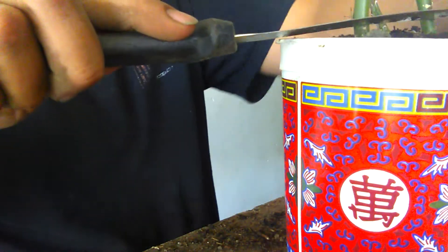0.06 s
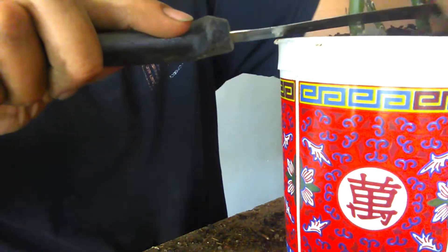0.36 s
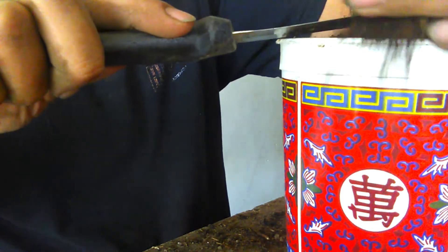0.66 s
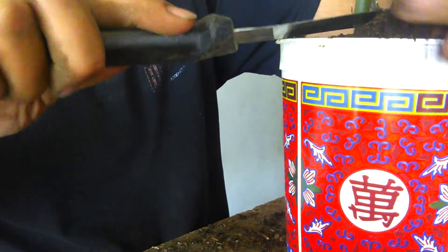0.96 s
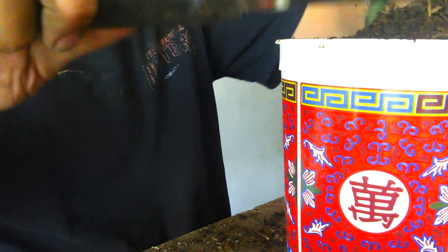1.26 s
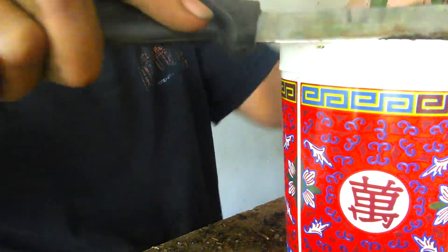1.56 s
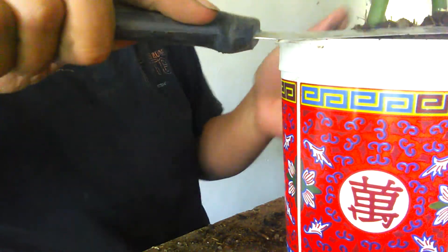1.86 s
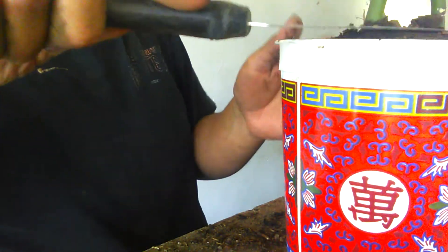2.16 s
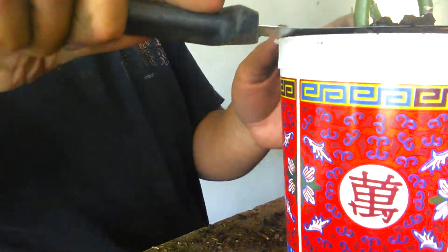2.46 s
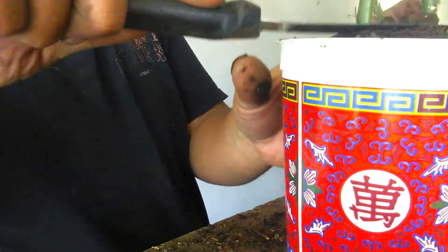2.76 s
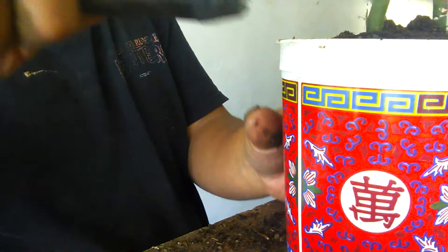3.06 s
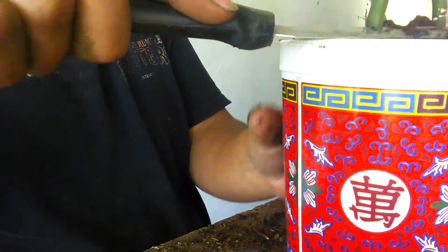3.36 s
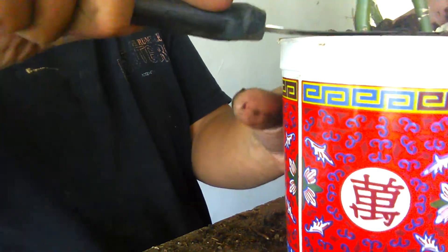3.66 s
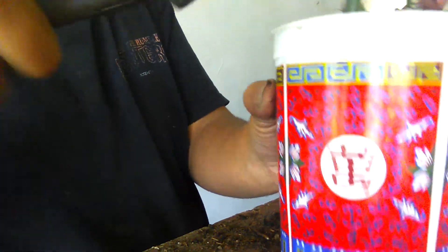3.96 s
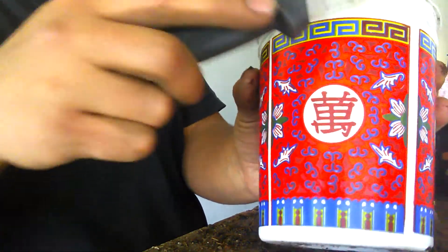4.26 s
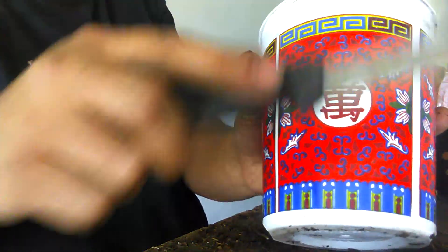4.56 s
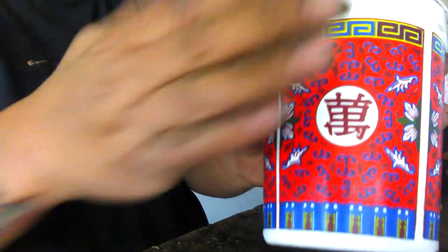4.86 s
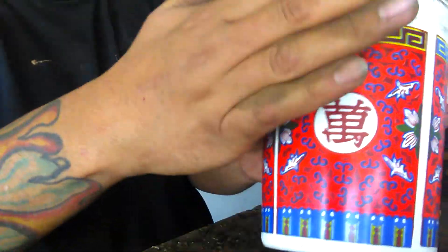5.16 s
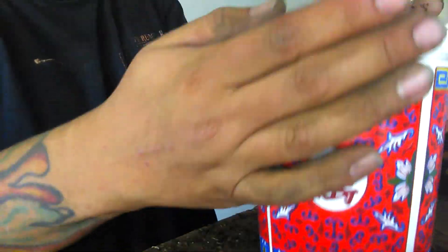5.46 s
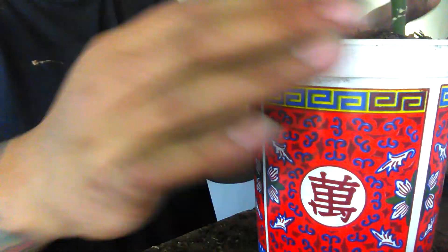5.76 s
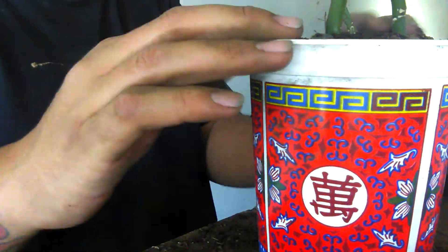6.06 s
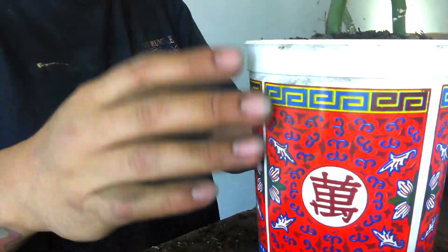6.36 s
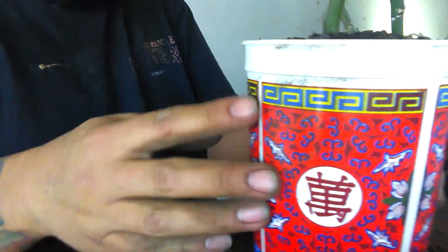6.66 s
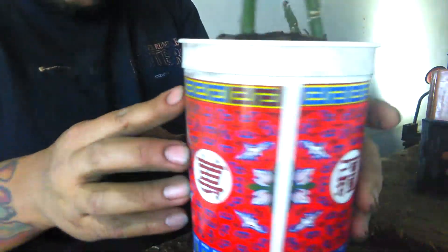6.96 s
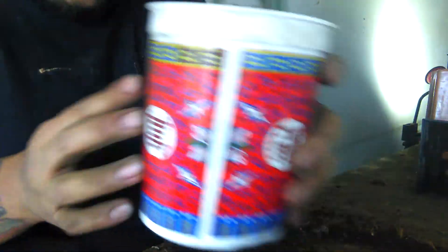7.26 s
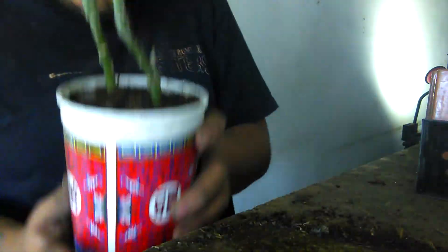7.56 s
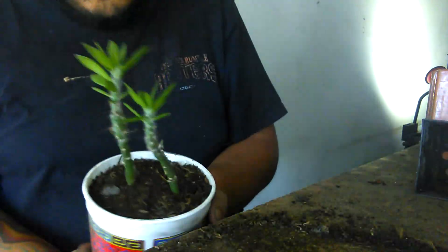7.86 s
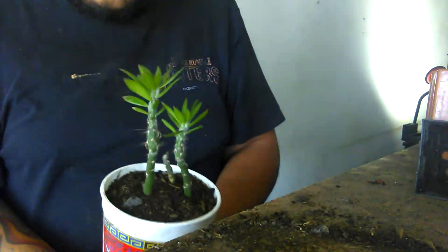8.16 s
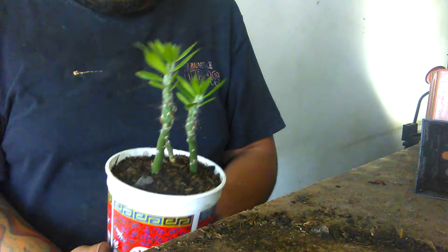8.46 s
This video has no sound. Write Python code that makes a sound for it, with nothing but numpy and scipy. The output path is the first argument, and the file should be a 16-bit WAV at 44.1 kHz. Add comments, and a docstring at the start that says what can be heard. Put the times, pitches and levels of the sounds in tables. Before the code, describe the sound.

A blunt knife faintly scrapes soil from a small plastic plant pot, with crumbling clods, short rasps along the rim and light ticks. Midway the knife drops on the wooden workbench, clacking and ringing briefly as it rocks to rest. Hands bump the pot, drag it juddering over grit and knock it once against the bench edge. Microphones stand on the bench in a small hard-walled room, with thuds heavier on the left.

```python
"""A wooden workbench in a small hard-walled room. A blunt knife scrapes soil off a small plastic plant
pot, rasps along its rim, taps its wall and is dropped on the bench, where it clacks and rings.
Hands shift the pot, drag it stick-slip over grit and bump it against the edge.
The microphones stand on the bench, so its thuds reach the left one through the wood."""
import sys
import numpy as np
from scipy import signal
from scipy.fft import rfft, irfft
from scipy.io import wavfile
from scipy.ndimage import uniform_filter1d

SR = 44100
rng = np.random.default_rng(int(sys.argv[2]) if len(sys.argv) > 2 else 0)


def inscribe(sig):
    """Save sig as 16-bit PCM at rate SR to the path in sys.argv[1].

    A 1-D sig is mono; a 2-D sig holds one channel per row.
    Samples are clipped to [-1, 1] before scaling.
    """
    pcm = np.round(np.clip(np.atleast_2d(sig).T, -1, 1) * 32767)
    wavfile.write(sys.argv[1], SR, pcm.astype(np.int16))


N = 383229
TIME_S = np.arange(N) / SR
FREQ_HZ = np.fft.rfftfreq(N, 1 / SR)
BLOW_SAMPLES = .02 * SR  # rms window of a blow's level
LN_1000 = np.log(1000)  # 60 dB of decay

# pot wall modes: (frequency [Hz], level [dB], t60 [s], right gain [signed ratio])
POT_MODES = [(277.4, -1, 0.049, -0.47), (503, -19, 0.0058, -0.018), (648.5, 1, 0.034, -0.17),
             (748, -1, 0.037, 0.14), (899, 5, 0.033, -0.11), (928.7, 3, 0.035, -0.069),
             (1154, -19.5, 0.02, -0.84)]
# spectra of grit, pot rim, ticks on plastic, crushed soil: (frequency [Hz], level [dB])
GRIT_SPECTRUM = [(200, -13), (900, 2), (2000, 5.5), (3700, 3), (5200, -4), (7600, -3), (9500, -11),
                 (15000, -17)]
RIM_SPECTRUM = [(300, -15), (1200, -4.5), (1600, -7.5), (1950, -3), (2300, -4.5), (2800, -7), (3450, -3),
                (3800, -4), (4150, -3.5), (4600, -9.5), (5100, -13), (5800, -21), (7500, -18.5),
                (15000, -28.5)]
TICK_SPECTRUM = [(500, -11), (2000, -15), (5000, -0.5), (7500, 0), (10000, -5), (15000, -18)]
SOIL_SPECTRUM = [(200, -1), (600, 9), (1200, 3), (2100, -8), (3000, -24), (8000, -13), (15000, -26.5)]


def knife_fall():
    """Knife lands tip first, then on its handle, and rocks to rest. Returns bench force, sound."""
    # contacts: (time [s], thud [dB], handle clack [dB], blade clink [dB], pot wall [dB])
    contacts = [(4.809, -44.5, -44, -28, -47), (4.8208, -33, -47, -29, -34.5),
                (4.828, -41.5, -37.5, -43, -46.5), (4.8598, -31.5, -17.5, -36.5, -16),
                (4.8645, -21, -26.5, -55, -32), (4.873, -26, -33, -37.5, -34.5),
                (4.894, -30, -45, -44, -53), (4.9015, -48, -27, -38, -44.5), (4.9104, -29, -32, -39, -22),
                (4.939, -36.5, -46.5, -46, -35), (4.969, -31, -40, -54, -41),
                (4.9906, -27, -53, -51, -30.5), (5.011, -38.5, -49, -45, -46), (5.016, -36, -40, -39, -51),
                (5.029, -38.5, -53, -40.5, -48), (5.0433, -31.5, -46.5, -40.5, -46)]
    # free knife: (frequency [Hz], level [dB], t60 [s])
    knife_modes = [(318.4, 0.5, 0.58), (458, 3.5, 0.29), (619, 5, 0.38), (674, 1.5, 0.19),
                   (755, -0.5, 0.34), (970, 4.5, 0.23), (1180, 8.5, 0.24), (1285, 0, 0.64),
                   (1322, 0.5, 0.51), (1450, 1, 0.2), (1480, -17.5, .6), (1814, 11.5, 0.14),
                   (1910, 2.5, 0.17), (2360, 0, .2), (2433, -1.5, .33), (3000, -3, .3), (2961, -3.5, 0.291)]
    # handle and blade impacts: (frequency [Hz], level [dB])
    clack_spectrum = [(80, -28.5), (200, 12.5), (290, 5), (410, 4.5), (520, -1), (720, 10.5), (1000, -1),
                      (1400, -2.5), (1900, 1.5), (2900, -7), (3700, -17), (8000, -32.5), (16000, -52)]
    clink_spectrum = [(200, -58), (800, 11), (1400, 4.5), (2100, 9), (3300, 4), (4300, -4.5), (7600, -3.5),
                      (9500, -14), (15000, -26)]
    # clack lows travel through the board, so the right gets less: (frequency [Hz], gain [dB])
    clack_right_eq = [(100, -13), (230, -8), (350, -2.5), (520, 4), (720, -11), (1000, 3), (2000, -2.5),
                      (8000, -2)]
    times_s, thud_db, clack_db, clink_db, wall_db = np.transpose(contacts)
    left, right = cracks(times_s, clack_db, clack_spectrum, decay_s=.0024, spike=.3,
                         chatter_db=-18, chatter_s=.012, rise_s=.0003)
    clack = np.array([amp(1) * left, equalise(right, clack_right_eq)])
    clink = cracks(times_s, clink_db, clink_spectrum, decay_s=.0046, spike=.061,
                   chatter_db=-23, chatter_s=.01, rise_s=.00047)
    ringing = convolve(impulses(times_s, clack_db), ring(knife_modes, spread_db=4.5))
    wall = resonate(impulses(times_s, wall_db), body(POT_MODES, contact_hz=1440))  # via the board
    grit = grit_scatter(impulses(times_s, clink_db))
    return impulses(times_s, thud_db), clack + stereo(2, 0) * clink + amp(-8.5) * ringing + wall + grit


def soil_scraping():
    """Soil hisses under blade and fingers; grains snap and clods crumble."""
    # hand strokes: (time [s], length [s], level [dB])
    strokes = [(0.517, 0.078, -58.5), (0.66, 0.74, -61), (1.197, 0.39, -60.5), (3.222, 0.19, -54),
               (3.432, 0.12, -53.5), (3.54, 0.12, -58.5), (4.256, 0.11, -48.5), (4.574, 0.35, -65.5),
               (5.92, 0.12, -62), (6.2, 0.058, -65), (6.362, 0.033, -62), (6.456, 0.17, -61.5)]
    # crumbling clods: (time [s], length [s], level [dB], pitch [Hz])
    crumbs = [(.257, 0.011, -58, 1900), (.345, 0.04, -59.5, 890), (.383, 0.018, -58.5, 980),
              (.53, 0.021, -57.5, 1690), (.556, 0.016, -63, 1290), (.79, .018, -56, 895),
              (.812, 0.023, -52.5, 840), (.932, 0.024, -66, 750), (.958, 0.013, -54, 1440),
              (.98, 0.021, -58, 1020), (1.09, .025, -58, 900), (1.199, 0.0062, -56, 1820),
              (1.264, 0.011, -68, 1350), (1.279, 0.0079, -55, 1250), (1.296, 0.011, -54, 940),
              (1.318, 0.016, -56, 980)]
    stroke = swells(strokes, rise_share=.077, fall_share=.48)
    clumping = unit_rms(amp(2.5 * wander(rate_hz=30)))
    slips = stereo_grains(per_s=1300, spread_db=2) * stroke * clumping
    hiss = amp(-6) * tint(slips, GRIT_SPECTRUM)
    snaps = amp(-11) * tint(stereo_grains(per_s=420, spread_db=1) * stroke, TICK_SPECTRUM)
    hollow = amp(-5.5) * resonate(slips[0], body(POT_MODES, contact_hz=1498))
    return hiss + snaps + scuffs(crumbs, per_s=2600, width_oct=1.27) + hollow


def rim_rasps():
    """An edge chatters along the rim; the hand-damped blade rings differently at each stroke."""
    # rasps: (time [s], length [s], level [dB])
    rasps = [(1.676, 0.048, -56), (1.709, 0.024, -57.5), (1.866, 0.024, -49), (1.987, 0.025, -53.5),
             (3.285, 0.045, -44.5), (3.349, 0.012, -48), (3.442, 0.014, -41.5), (3.479, 0.034, -54.5),
             (3.714, 0.024, -63), (3.991, 0.013, -60), (4.203, 0.008, -68), (4.229, 0.017, -53),
             (5.302, 0.026, -50), (6.128, 0.052, -57)]
    # gripped blade: (frequency [Hz], level [dB], t60 [s])
    blade_modes = [(1390, -4.5, 0.046), (2010, -1, 0.011), (2410, -6, 0.014), (3160, -8.5, 0.038),
                   (3315, 6, 0.016), (3810, 1.5, 0.013), (4020, 5, 0.011), (4500, -12, 0.025),
                   (5080, 4.5, 0.0059), (6200, -6, 0.015), (6560, -9, 0.016)]
    chatter = stereo_grains(per_s=1800, spread_db=2)
    blade, force = np.zeros((2, 2, N))
    for start_s, length_s, db in rasps:
        slips = amp(db) * triangle(length_s) * segment(chatter, start_s, length_s)
        add(force, start_s, slips)
        add(blade, start_s, convolve(slips, ring(blade_modes, spread_db=3)))
    rim = amp(-7) * tint(force, RIM_SPECTRUM) + amp(-10) * tint(force, GRIT_SPECTRUM)
    hollow = resonate(force[0], body(POT_MODES, contact_hz=1498))
    return amp(-2) * blade + rim + amp(-1.5) * hollow


def pot_taps():
    """Blade, nails and grit tick on the plastic; the stiff rim chirps. Returns bench force, sound."""
    # taps: (time [s], tick [dB], thud [dB], pot wall [dB], rim [dB])
    taps = [(0.629, -55, -62, -68, -66), (1, -48.5, -61, -78, -75), (1.087, -57, -70, -66, -70),
            (1.477, -50, -64, -80, -65), (1.6809, -55, -52, -65, -64), (1.8721, -46.5, -49, -71, -78),
            (1.9951, -48, -45, -72, -56.5), (2.4986, -38.5, -49, -38, -55.5), (2.6, -55, -73, -73, -74),
            (3.4996, -42, -50, -57, -60), (4.256, -31, -40.5, -62, -39.5), (4.3984, -42, -67.5, -48, -41),
            (4.408, -60, -41, -36.5, -48), (4.5389, -50, -48, -51, -42.5), (4.552, -45, -42, -43.5, -49.5),
            (5.0428, -37, -56.5, -60, -38), (5.1946, -60, -43.5, -48, -46.5),
            (5.5129, -43, -43.5, -30, -47), (6.7992, -35.5, -37, -33, -56), (6.892, -42, -38, -38.5, -52.5),
            (6.974, -40, -50, -45, -77), (7.0337, -56, -41, -34, -63), (7.0562, -30, -35, -28.5, -58),
            (7.0937, -43, -50, -44, -58)]
    times_s, tick_db, thud_db, wall_db, rim_db = np.transpose(taps)
    tick = cracks(times_s, tick_db, TICK_SPECTRUM, decay_s=.00033, spike=.087,
                  chatter_db=-15.5, chatter_s=.0053)
    rim = cracks(times_s, rim_db, RIM_SPECTRUM, decay_s=.0011, spike=.156,
                 chatter_db=-17.5, chatter_s=.015)
    sound = amp(-13) * pot_wall(times_s, wall_db) + amp(-14) * tick + stereo(.5, 1.5) * rim
    return amp(.5) * impulses(times_s, thud_db), sound


def pot_bumps():
    """Soft contacts rock the pot and crush grit. Returns bench force, sound."""
    # bumps: (time [s], thud [dB], pot wall [dB], grit [dB])
    bumps = [(0.788, -62, -53, -56), (0.869, -63, -51, -77), (0.934, -56, -55, -61),
             (1.017, -46, -46.5, -81), (2.002, -39, -66, -59), (2.63, -30.5, -53.5, -55.5),
             (3.268, -18.5, -58, -58), (3.927, -28.5, -57, -62), (4.12, -22.5, -49, -61),
             (4.163, -28, -47.5, -58), (5.402, -23, -42.5, -50.5), (5.645, -26, -51.5, -55),
             (5.676, -25, -52.5, -62), (5.982, -52, -53.5, -62), (6.424, -41, -46.5, -63),
             (6.485, -50, -67, -62), (6.735, -28, -69, -69), (6.787, -18.5, -59, -70),
             (7.208, -34, -60.5, -66)]
    times_s, thud_db, wall_db, grit_db = np.transpose(bumps)
    grit = cracks(times_s, grit_db, GRIT_SPECTRUM, decay_s=.0071, spike=.073,
                  chatter_db=16, chatter_s=.018)
    return amp(-18) * impulses(times_s, thud_db), amp(-6) * pot_wall(times_s, wall_db) + amp(-2.5) * grit


def edge_knock():
    """The pot hits the bench edge and skips once, damped by the hands. Returns bench force, sound."""
    # hits: (time [s], knock [dB], snap [dB])
    hits = [(7.5523, -20, -49.5), (7.5588, -38, -55)]
    # pot and board together: (frequency [Hz], level [dB], t60 [s], right gain [signed ratio])
    knock_modes = [(132, 0.5, 0.075, -0.13), (265, -2, 0.048, 0.06), (455, -16, 0.063, 0.29),
                   (657, -21, 0.091, 0.089), (913, -6.5, 0.05, 0.071), (1250, -18, 0.065, 0.23)]
    times_s, knock_db, snap_db = np.transpose(hits)
    snap = cracks(times_s, snap_db, GRIT_SPECTRUM, decay_s=.00062, spike=.16,
                  chatter_db=-22, chatter_s=.0067)
    soil = cracks(times_s, knock_db, SOIL_SPECTRUM, decay_s=.007, spike=.12,
                  chatter_db=-13, chatter_s=.017, rise_s=.0039)
    force = -impulses(times_s, knock_db)
    knock = resonate(force, body(knock_modes, contact_hz=1070))
    return amp(-9.5) * force, amp(4) * (knock + snap) + amp(-27) * soil


def pot_drag():
    """The base sticks and slips on grit, shaking board and pot. Returns bench force, sound."""
    # shoves: (time [s], length [s], judder [dB], pot wall [dB], grit [dB])
    shoves = [(4.106, 0.035, -72, -50, -61.5), (4.155, 0.14, -53, -57, -62.5),
              (5.372, 0.065, -52, -48, -61.5), (6.406, 0.039, -48, -43, -67),
              (6.733, 0.25, -44.5, -48, -58.5), (6.897, 0.039, -46, -47, -55.5),
              (6.93, 0.11, -37.5, -48.5, -59.5), (7.007, 0.1, -33.5, -40.5, -59)]
    # grit catching under the base: (time [s], length [s], level [dB], pitch [Hz])
    catches = [(6.805, 0.019, -53, 2900), (6.838, 0.054, -52.5, 2580), (6.897, 0.025, -52, 3030),
               (7.026, 0.022, -48, 1200), (7.095, 0.035, -57, 3050)]
    judder, wall, grit = swells(shoves, rise_share=.23, fall_share=.48)
    hollow = resonate(grains(per_s=1700, spread_db=3) * wall, body(POT_MODES, contact_hz=1250))
    slips = stereo_grains(per_s=950, spread_db=4.5) * unit_rms(amp(1.7 * wander(rate_hz=30)))
    scratch = stereo(-2.5, 1.5) * tint(slips * grit, GRIT_SPECTRUM)
    coarse = stereo_grains(per_s=260, spread_db=3) * grit
    crackle = amp(-14) * tint(coarse, GRIT_SPECTRUM) + stereo(7, 2) * tint(coarse, SOIL_SPECTRUM)
    tremble = amp(1.5) * grains(per_s=970, spread_db=4) * judder
    force = tremble + stick_slip(start_s=6.9545, rate_hz=48.37, count=5)
    return force, amp(7) * hollow + scratch + crackle + scuffs(catches, per_s=1000, width_oct=.36)


def stick_slip(start_s, rate_hz, count):
    """The base lets go at an even pace with uneven force."""
    return impulses(start_s + np.arange(count) / rate_hz, -36.5 - 2 * rng.standard_normal(count))


def pot_wall(times_s, levels_db):
    """The soil-damped wall gives a short hollow note; the soil inside crunches."""
    notes = np.zeros((2, N))
    for start_s, db in zip(times_s, levels_db):
        note = body(POT_MODES, contact_hz=1484, spread_db=3)
        add(notes, start_s, amp(db) * np.sqrt(BLOW_SAMPLES) * note)
    soil = cracks(times_s, levels_db, SOIL_SPECTRUM, decay_s=.016, spike=.52, chatter_db=0, chatter_s=.02)
    return amp(10) * notes + stereo(-1, -4) * soil


def wall_groans():
    """The wall flexes under the hand and groans near its lowest note, carried left by the board."""
    # flexes: (time [s], length [s], level [dB], pitch [Hz])
    flexes = [(1.998, 0.032, -52, 227), (3.268, 0.035, -47, 317), (5.388, 0.044, -33, 273),
              (6.425, 0.047, -47, 290), (6.472, 0.093, -52, 276), (7.025, 0.046, -39, 290)]
    return stereo(0, -8) * scuffs(flexes, per_s=1100, width_oct=.35)[0]


def grit_scatter(force, decay_s=.028):
    """Grit thrown up by a blow patters back in a dying fizz."""
    pole = np.exp(-2 / (decay_s * SR))
    envelope = np.sqrt(signal.lfilter([1 - pole], [1, -pole], force ** 2))
    return amp(-13.5) * tint(stereo_grains(per_s=4200, spread_db=2) * envelope, GRIT_SPECTRUM)


def bench_thuds(force, frame_t60_s=.36, frame_rise_s=.0073):
    """The board thuds and its frame murmurs on, mostly left."""
    # board: (frequency [Hz], level [dB], t60 [s], right gain [signed ratio])
    board_modes = [(79.7, -1.5, 0.18, 0.15), (131.2, 6, 0.093, -0.12), (179.3, 1.5, 0.14, -0.11),
                   (262.7, 5, 0.079, -0.28), (290.4, 4, 0.052, -0.29), (414, -8, 0.069, -0.4)]
    # dense modes of bench and frame: (frequency [Hz], level [dB])
    frame_spectrum = [(40, -20.5), (70, -0.5), (150, 1), (300, -3), (400, -10.5), (600, -25.5), (1500, -49),
                      (5000, -85.5)]
    t = TIME_S[:SR // 2]
    envelope = np.exp(-LN_1000 * t / frame_t60_s) * (1 - np.exp(-t / frame_rise_s))
    murmur = tint(rng.standard_normal((2, len(t))) * envelope, frame_spectrum)
    board = resonate(force, body(board_modes, contact_hz=590))
    return amp(1.5) * board + stereo(-10, -19) * convolve(force, murmur)


def leaning_rumble():
    """Hands and forearms shift their weight; the board rumbles unevenly."""
    # leans: (time [s], length [s], level [dB])
    leans = [(1.502, 7.6, -60.5), (3.02, 3.9, -61.5), (7.45, 1.1, -67)]
    # board rumble: (frequency [Hz], level [dB])
    rumble_spectrum = [(15, -14), (35, -8.5), (70, 9.5), (110, -5), (180, -12.5), (320, -22), (1000, -65.5),
                       (4000, -76)]
    weight = swells(leans, rise_share=.061, fall_share=.29) * unit_rms(amp(3.5 * wander(rate_hz=12)))
    return stereo(2.5, -3) * tint(rng.standard_normal(N) * weight, rumble_spectrum)


def room(x, onset_s=.0013, crossfade_s=.043, tails=5):
    """Diffuse small-room reverberation; random tails alternate so no pitch keeps ringing."""
    # reflections: (frequency [Hz], level [dB])
    wall_spectrum = [(200, 6), (1000, 1), (2500, 0.5), (3700, 0), (5000, 1), (8000, -3), (15000, 2)]
    # room decay: (frequency [Hz], t60 [s])
    t60_s = [(100, 0.24), (400, 0.25), (1000, 0.47), (2500, 0.41), (3900, 0.39), (6000, 0.5), (14000, 0.36)]
    out, turn = 0, TIME_S / crossfade_s
    for k in range(tails):
        hz, t, bands = signal.stft(rng.standard_normal((2, SR)), SR, nperseg=256)
        decay = np.exp(-LN_1000 * t / lookup(t60_s, hz)[:, None])
        tail = signal.istft(bands * amp(lookup(wall_spectrum, hz))[:, None] * decay, SR, nperseg=256)[1]
        onset = 1 - np.exp(-(TIME_S[:tail.shape[1]] / onset_s) ** 2)
        share = np.sqrt(np.maximum(1 - abs((turn - k + 1) % tails - 1), 0))
        out = out + convolve(x * share, tail * onset)
    return out


def room_tone():
    """Low rumble, soft hiss and a faint wavering hum."""
    # noise floor and hum tones: (frequency [Hz], level [dB])
    noise_spectrum = [(12, -49), (20, -8.5), (90, 1), (106, -9), (207, -14), (266, -20), (352, -20.5),
                      (427, -27.5), (519, -18.5), (565, -24.5), (1540, -28.5), (2400, -31.5), (4500, -34.5),
                      (6700, -36), (7400, -31.5), (8100, -36), (15500, -37)]
    hum_tones = [(80.7, -72), (349.9, -76), (468.3, -83)]
    # noise balance: (frequency [Hz], left minus right [dB])
    balance = [(60, -8), (300, -5.5), (600, -2.5), (2000, 0.5), (7000, -2), (14000, 0)]
    coherence = lookup([(60, .0093), (300, .04), (1000, .039), (8000, .031)], FREQ_HZ)
    left, independent = rfft(rng.standard_normal((2, N)))
    right = coherence * left + np.sqrt(1 - coherence ** 2) * independent
    noise = np.array([left, right]) * amp(lookup(noise_spectrum, FREQ_HZ)) / np.sqrt((1 + coherence) / 2)
    noise *= amp(np.outer([.5, -.5], lookup(balance, FREQ_HZ)))
    hum = sum(amp(db) * unit_rms(np.sin(2 * np.pi * hz * TIME_S + .6 * wander(rate_hz=4)))
              for hz, db in hum_tones)
    return amp(-55) * unit_rms(irfft(noise, N)) + hum


def cracks(times_s, levels_db, spectrum, decay_s, spike, chatter_db, chatter_s, rise_s=.00059):
    """Each contact builds up, then gives a spike, a decaying crack and chatter."""
    lead_samples, right_lag_samples = 256, round(.0003 * SR)
    out, t = np.zeros((2, N)), TIME_S[:SR // 8] - lead_samples / SR
    fall = np.exp(-abs(t) / decay_s) + amp(chatter_db) * np.exp(-abs(t) / chatter_s)
    envelope = np.where(t < 0, np.exp(-abs(t) / rise_s), fall)
    for start_s, db in zip(times_s, levels_db):
        burst = whiten(rng.standard_normal((2, len(t))) * envelope)
        burst /= np.linalg.norm(burst, axis=1, keepdims=True)
        burst[[0, 1], [lead_samples, lead_samples + right_lag_samples]] += spike
        add(out, start_s - lead_samples / SR, burst * amp(db) * np.sqrt(BLOW_SAMPLES / (1 + spike ** 2)))
    return tint(out, spectrum)


def scuffs(rows, per_s, width_oct):
    """Short clumps of grains, each around its own pitch."""
    out, slips = np.zeros((2, N)), stereo_grains(per_s, spread_db=3.5)
    for start_s, length_s, db, hz in rows:
        edges_hz = hz * 2 ** (np.array([-.5, .5]) * width_oct)
        band = signal.butter(2, edges_hz, "bandpass", fs=SR, output="sos")
        clump = signal.sosfilt(band, segment(slips, start_s, length_s))
        add(out, start_s, amp(db) * unit_rms(clump) * triangle(length_s))
    return out


def impulses(times_s, levels_db):
    """One impulse per blow."""
    out = np.zeros(N)
    for start_s, db in zip(times_s, levels_db):
        add(out, start_s, amp([db]) * np.sqrt(BLOW_SAMPLES))
    return out


def grains(per_s, spread_db):
    """Random train of tiny uneven slips, rms 1."""
    size = amp(spread_db * np.minimum(rng.exponential(1, N), 4))
    return unit_rms(size * rng.standard_normal(N) * (rng.random(N) < per_s / SR))


def stereo_grains(per_s, spread_db):
    return np.array([grains(per_s, spread_db) for _ in range(2)])


def ring(modes, spread_db):
    """Decaying sines, random in strength and phase per channel."""
    t, out = TIME_S[:SR // 2], np.zeros((2, SR // 2))
    for channel in out:
        for hz, db, t60_s in modes:
            envelope = amp(db + spread_db * rng.standard_normal()) * np.exp(-LN_1000 * t / t60_s)
            channel += envelope * np.sin(2 * np.pi * (hz * t + rng.random()))
    return out


def body(modes, contact_hz, spread_db=0):
    """Stereo response of a struck body; a soft contact dulls it."""
    t, out = TIME_S[:SR // 4], 0
    for k, (hz, db, t60_s, right_gain) in enumerate(modes):
        mode = (-1) ** k * np.exp(-LN_1000 * t / t60_s) * np.cos(2 * np.pi * hz * t)
        out = out + np.outer([1, right_gain], mode) * amp(db + spread_db * rng.standard_normal())
    out = signal.sosfilt(signal.butter(2, contact_hz, fs=SR, output="sos"), out)
    return out / np.linalg.norm(out[0])


def resonate(force, response):
    return signal.oaconvolve(force[None], response, axes=1)[:, :N]


def convolve(x, response):
    """Convolves with the response scaled to energy 1 per channel."""
    response = np.atleast_2d(response)
    response = response / np.linalg.norm(response, axis=1, keepdims=True)
    return signal.oaconvolve(np.atleast_2d(x), response, axes=1)[:, :N]


def tint(x, spectrum, size=2048):
    """Minimum-phase filter of energy 1."""
    log_gain = np.log(amp(lookup(spectrum, abs(np.fft.fftfreq(size, 1 / SR)))))
    response = np.fft.ifft(np.exp(np.conj(signal.hilbert(log_gain)))).real
    return convolve(x, response[:size // 2])


def equalise(x, curve):
    return irfft(rfft(x) * amp(lookup(curve, FREQ_HZ)), N)


def whiten(burst):
    """Flattens broad peaks, so a burst clicks without pitch."""
    bins = rfft(burst)
    power = uniform_filter1d(abs(bins) ** 2, 48, axis=-1)
    return irfft(bins / np.sqrt(power + 1e-12), burst.shape[-1])


def swells(rows, rise_share, fall_share):
    """Hand movements start, hold and stop: one envelope per level column."""
    out = 0
    for start_s, length_s, *levels_db in rows:
        progress = (TIME_S - start_s) / length_s
        trapezoid = np.clip(np.minimum(progress / rise_share, (1 - progress) / fall_share), 0, 1)
        out = out + np.outer(amp(levels_db), trapezoid)
    return out


def triangle(length_s):
    return np.interp(TIME_S[:round(length_s * SR)] / length_s, [0, .2, 1], [0, 1, 0])


def wander(rate_hz):
    """Smooth noise, rms 1."""
    return unit_rms(irfft(rfft(rng.standard_normal(N)) * np.exp(-(FREQ_HZ / rate_hz) ** 2), N))


def lookup(curve, hz):
    """Interpolates over log frequency."""
    knots_hz, values = np.transpose(curve)
    return np.interp(np.log(hz + 1), np.log(knots_hz + 1), values)


def segment(x, start_s, length_s):
    return x[:, round(start_s * SR):][:, :round(length_s * SR)]


def add(mix, start_s, sound):
    part = mix[..., round(start_s * SR):][..., :sound.shape[-1]]
    part += sound[..., :part.shape[-1]]


def amp(db):
    return 10 ** (np.asarray(db) / 20)


def stereo(left_db, right_db):
    return amp([[left_db], [right_db]])


def unit_rms(x):
    return x / np.sqrt(np.mean(x ** 2) + 1e-20)


def scene():
    """Contacts shake the bench and sound into the room."""
    forces, sounds = zip(knife_fall(), pot_taps(), pot_bumps(), edge_knock(), pot_drag())
    thuds = bench_thuds(sum(forces))
    airborne = soil_scraping() + rim_rasps() + wall_groans() + sum(sounds)
    reverb = room(airborne[1] + amp(3) * thuds[1])  # the right channel is the air path
    return thuds + airborne + amp(-9) * reverb + leaning_rumble() + room_tone()


def record(dry, ceiling=.75, cutoff_hz=15750):
    """Duller left channel, soft clip, low-pass."""
    # left microphone: (frequency [Hz], gain [dB])
    left_eq = [(100, 3.5), (1000, -4), (2000, -4.5), (7500, -3), (9500, -8), (11500, -11), (16000, -11.5)]
    channels = np.array([equalise(dry[0], left_eq), dry[1]])
    clipped = ceiling * np.tanh(channels / ceiling)
    lowpass = signal.firwin(511, cutoff_hz, window=("kaiser", 9), fs=SR)
    return signal.oaconvolve(clipped, lowpass[None], "same")


dry = scene()
out = record(dry)
inscribe(out)
```